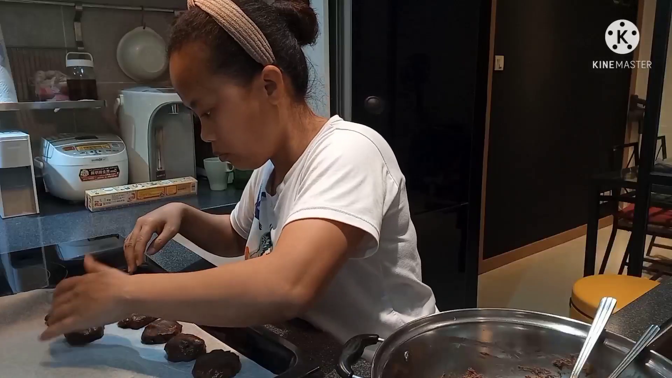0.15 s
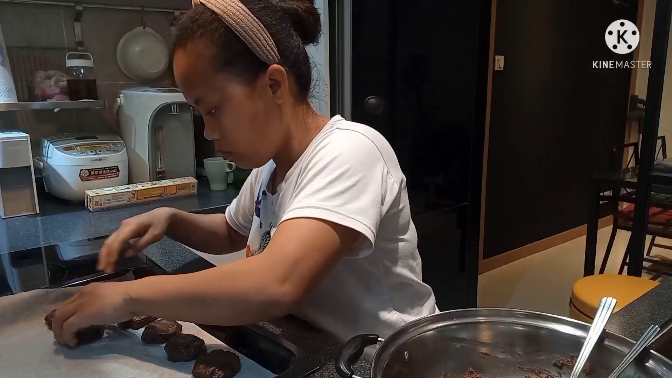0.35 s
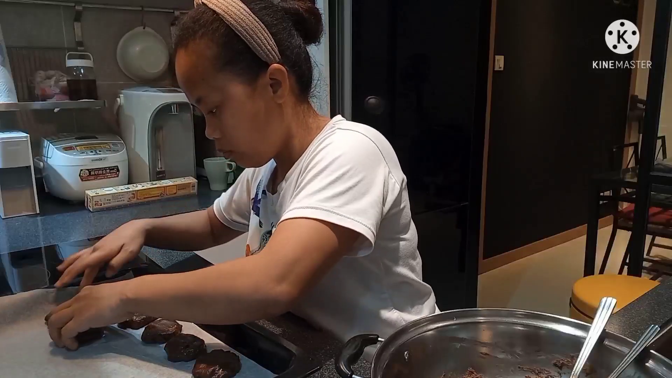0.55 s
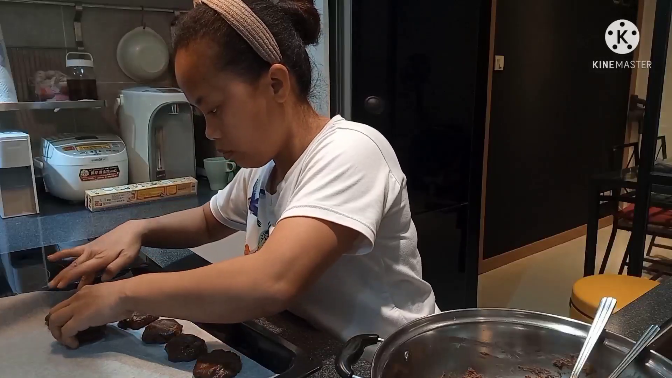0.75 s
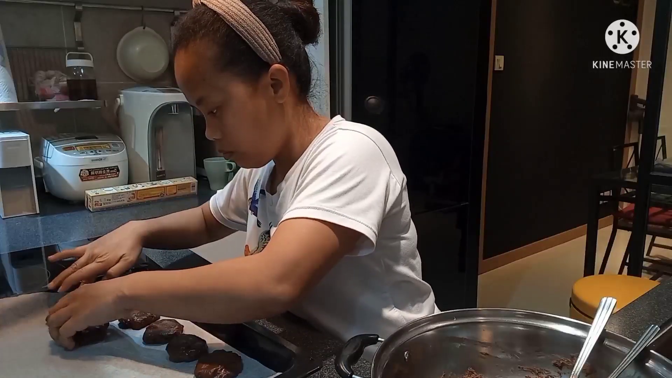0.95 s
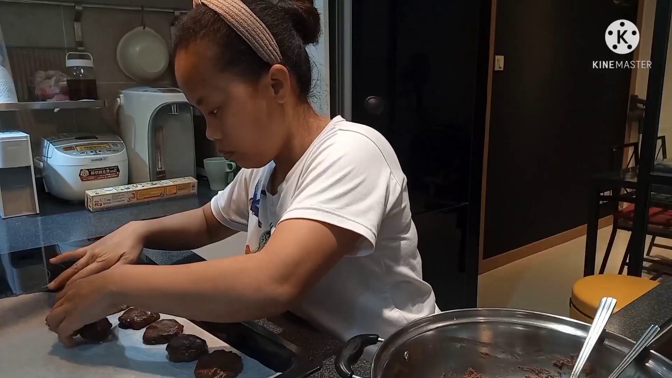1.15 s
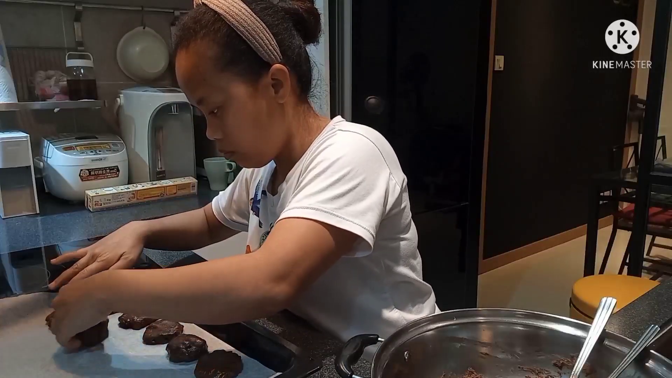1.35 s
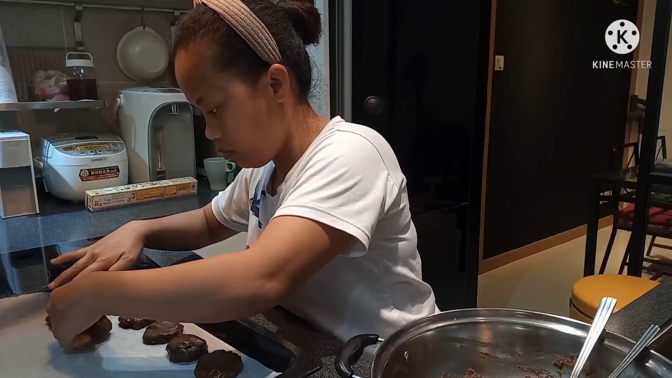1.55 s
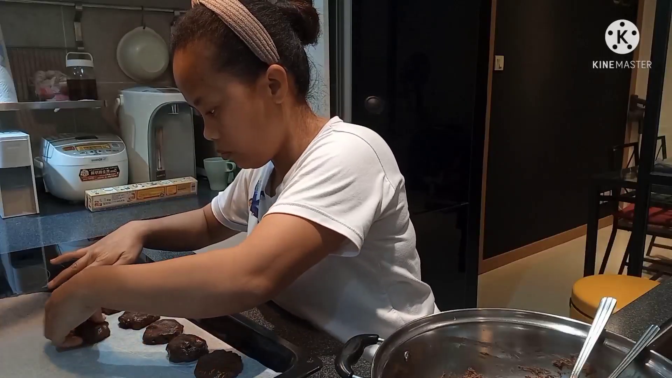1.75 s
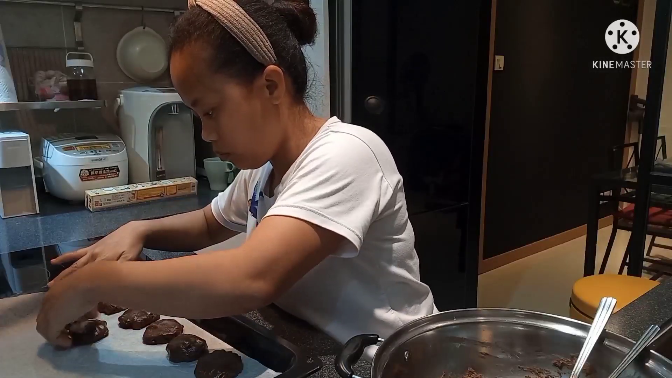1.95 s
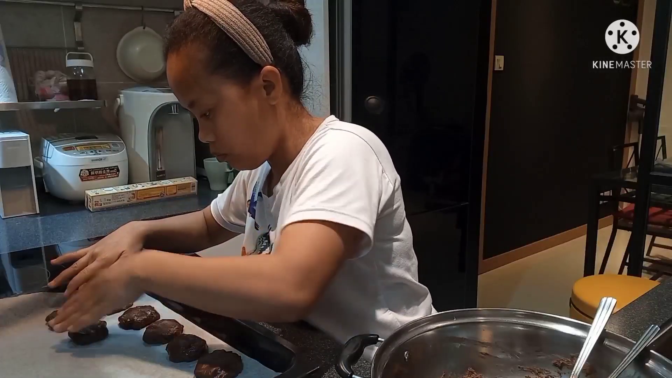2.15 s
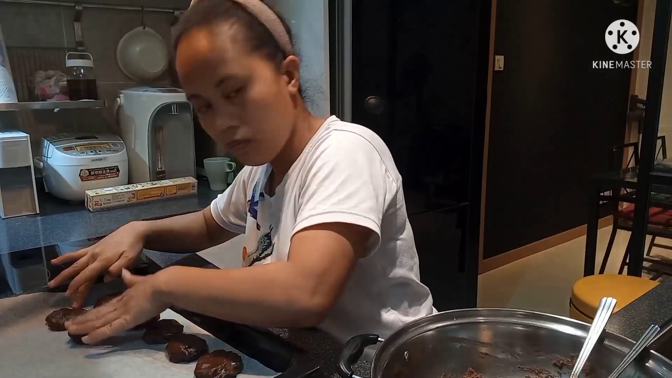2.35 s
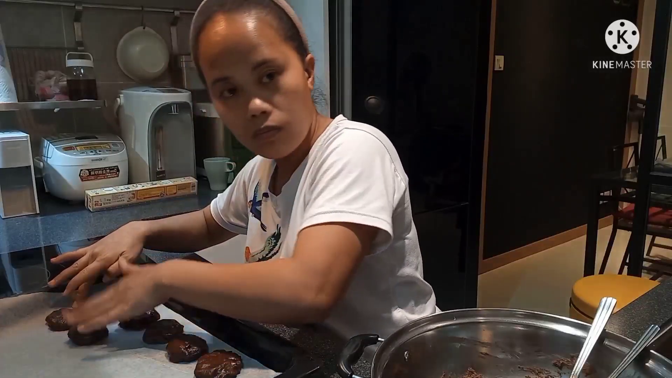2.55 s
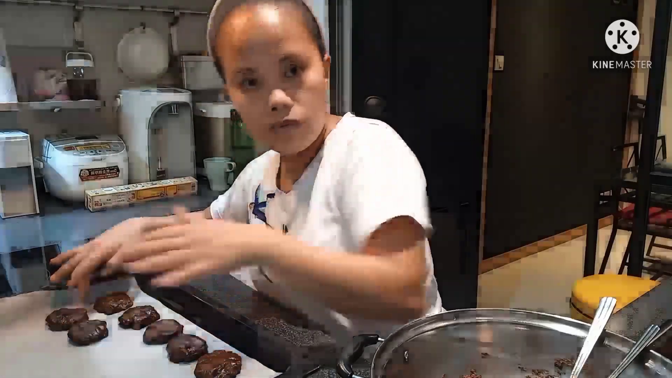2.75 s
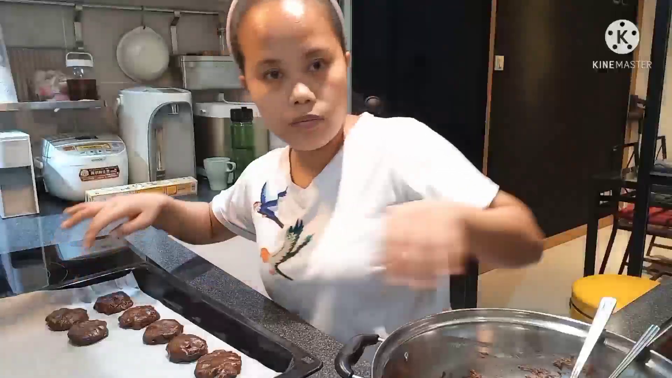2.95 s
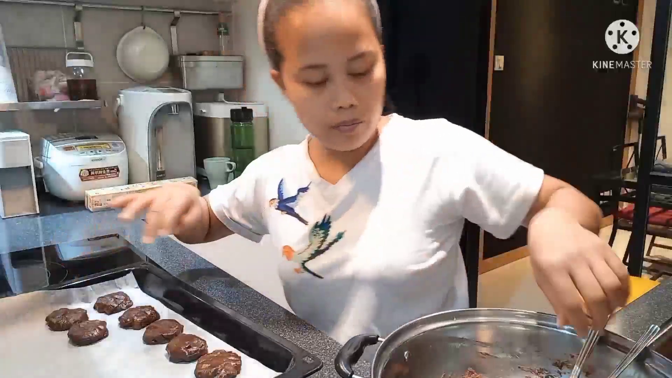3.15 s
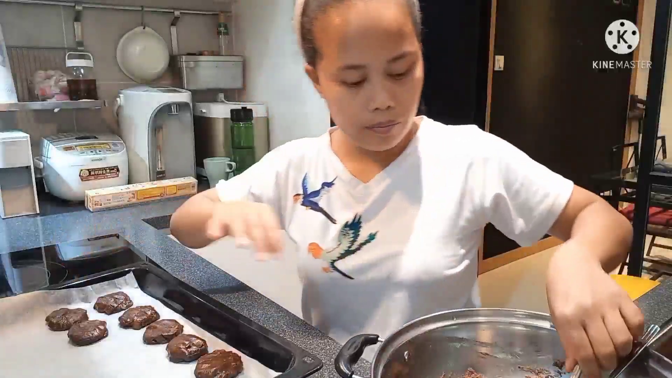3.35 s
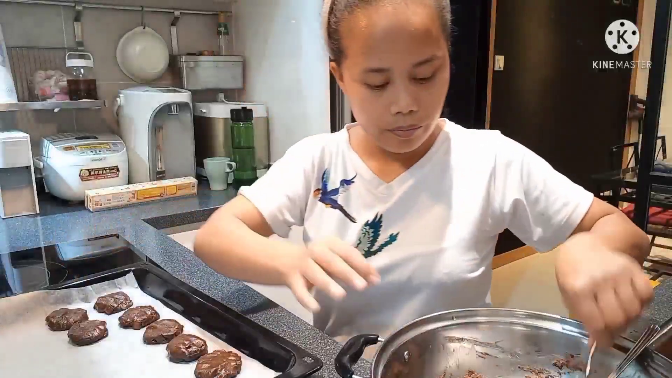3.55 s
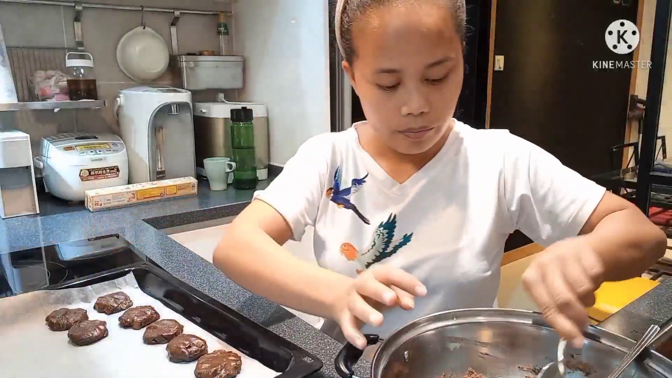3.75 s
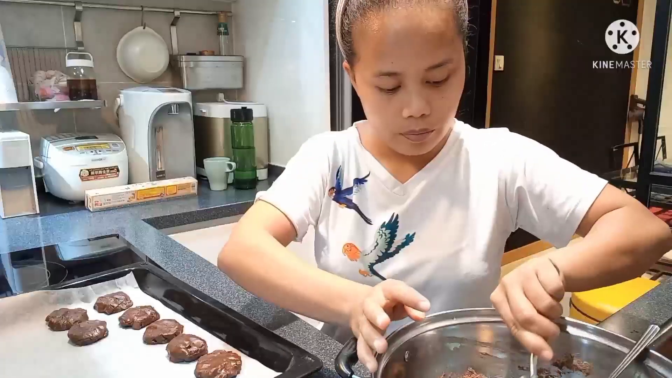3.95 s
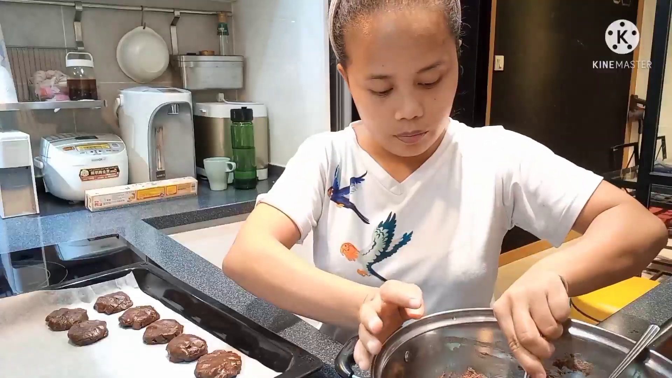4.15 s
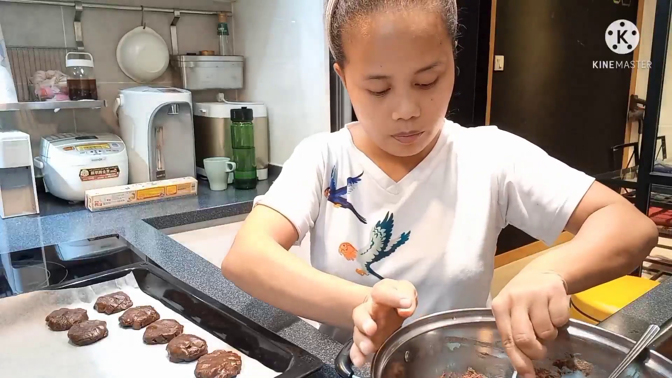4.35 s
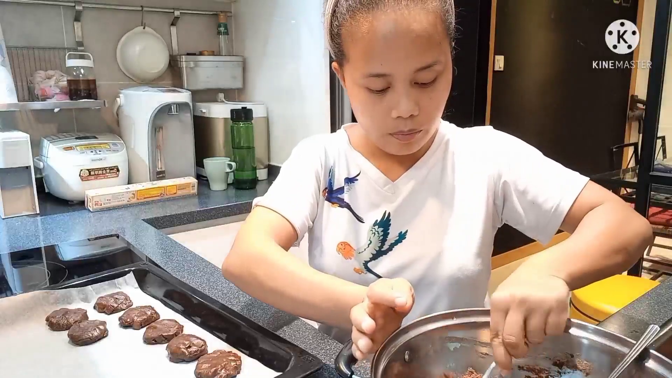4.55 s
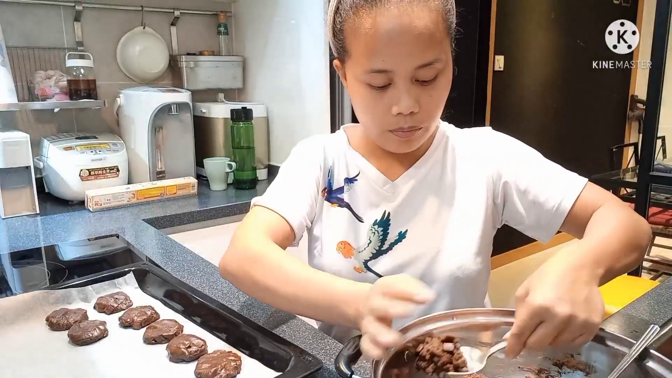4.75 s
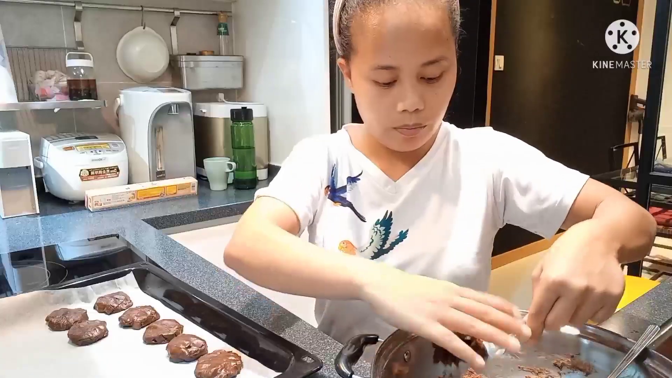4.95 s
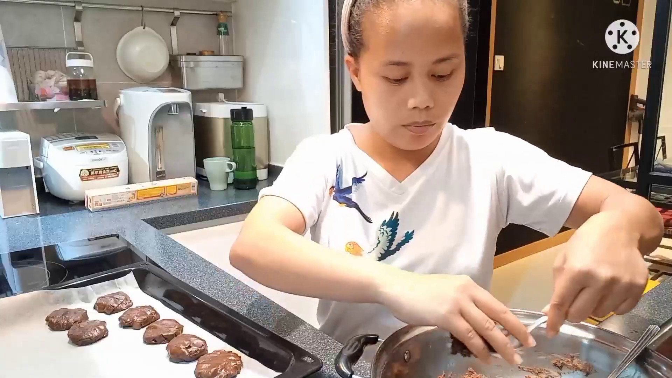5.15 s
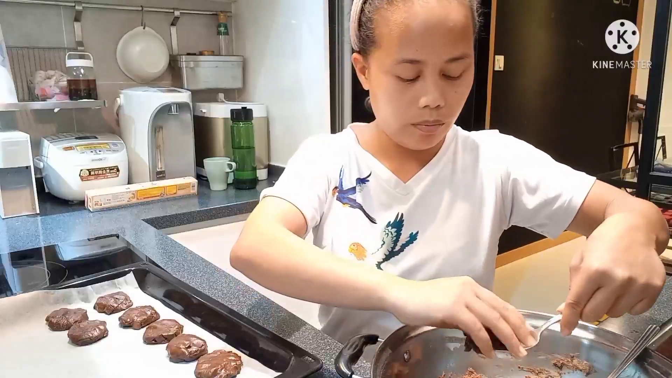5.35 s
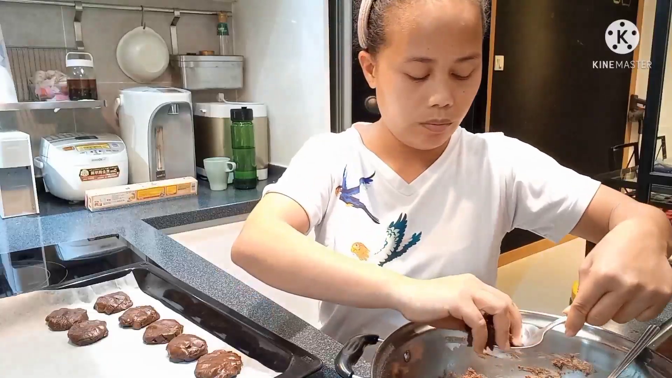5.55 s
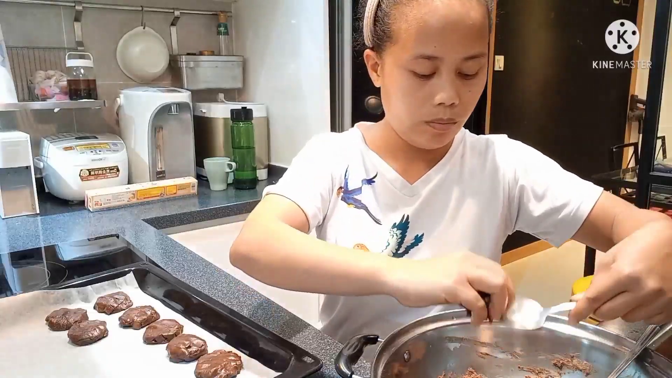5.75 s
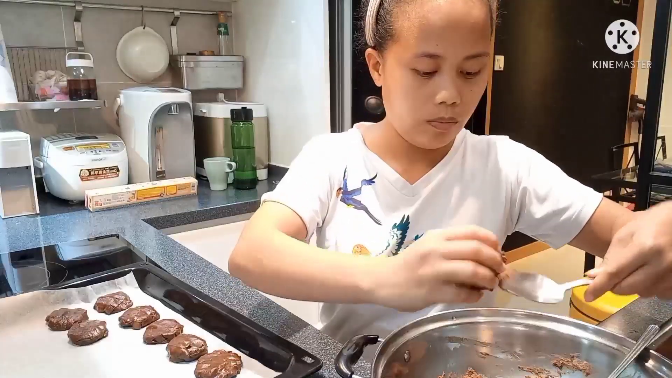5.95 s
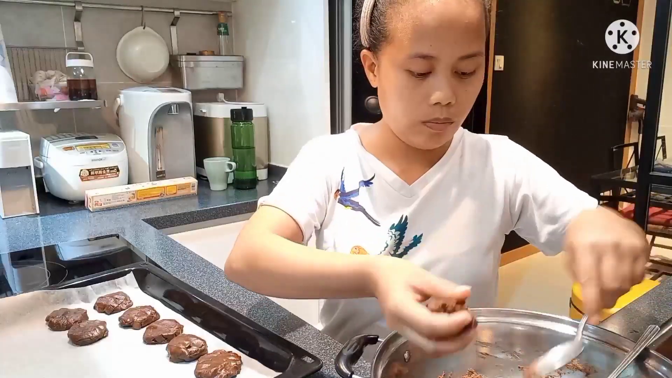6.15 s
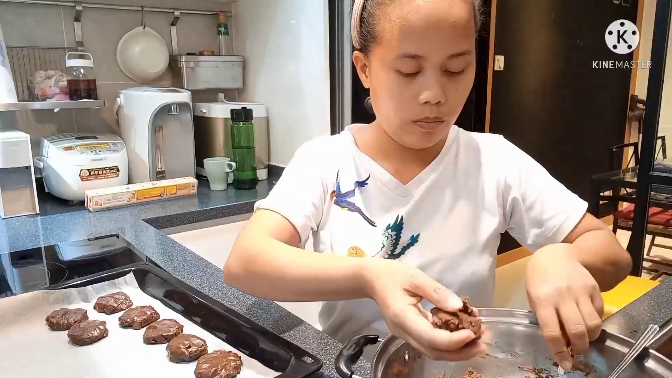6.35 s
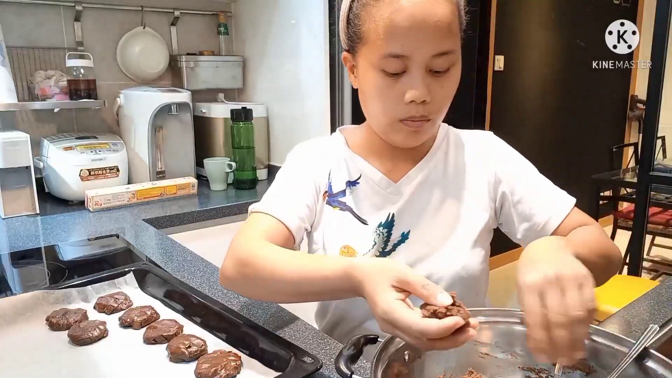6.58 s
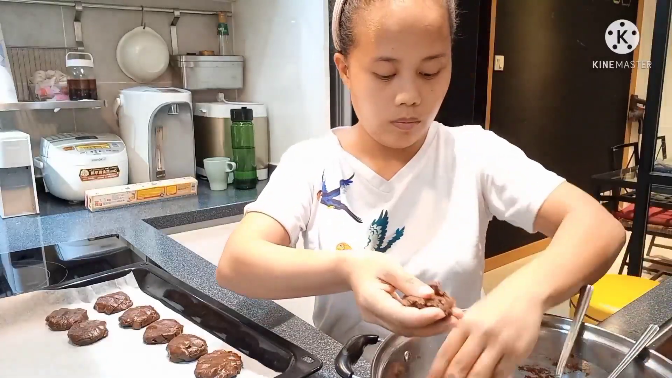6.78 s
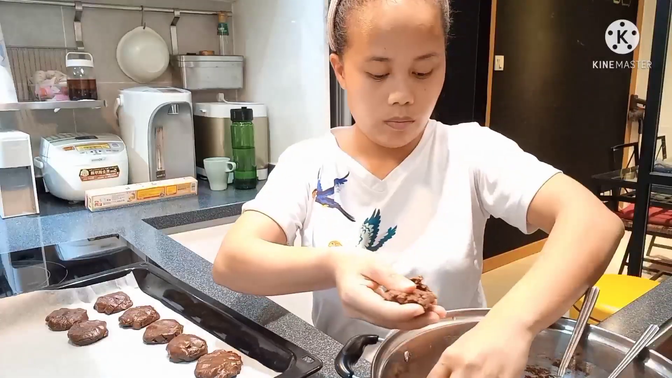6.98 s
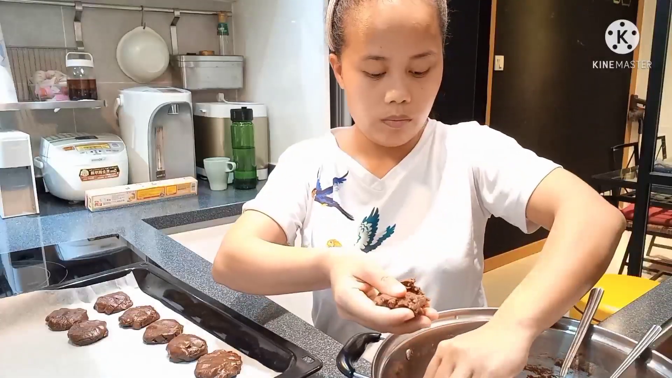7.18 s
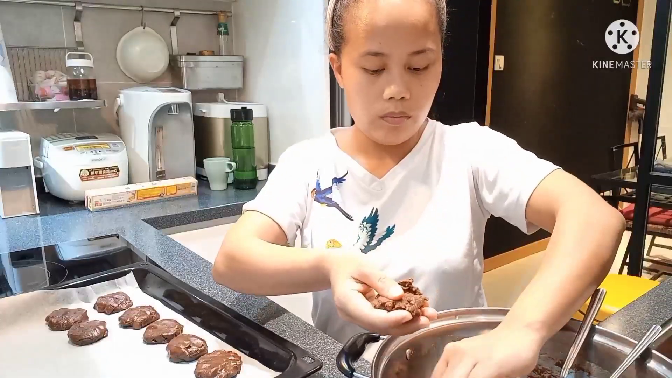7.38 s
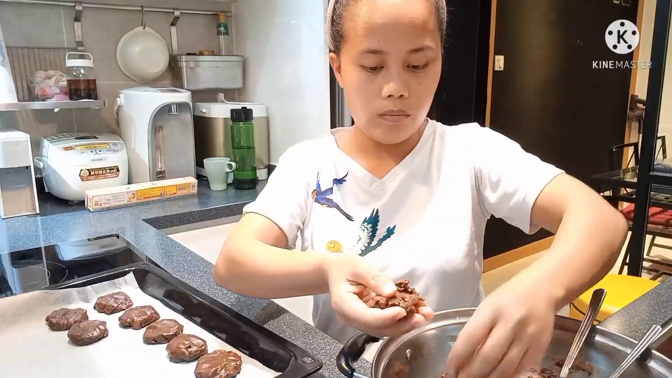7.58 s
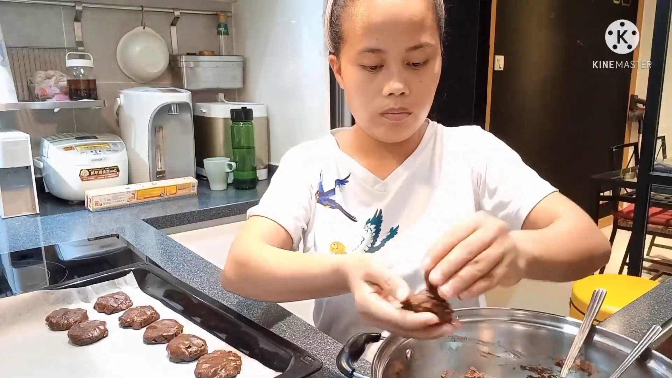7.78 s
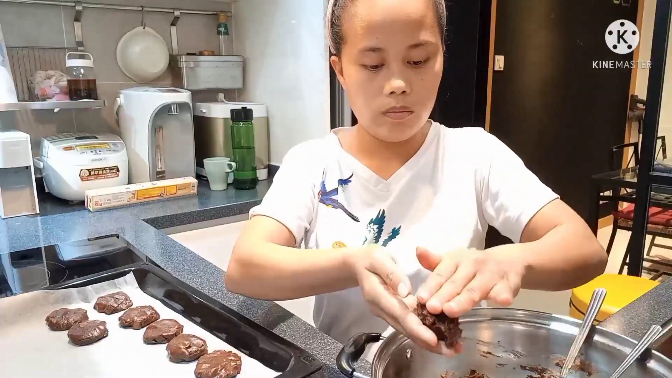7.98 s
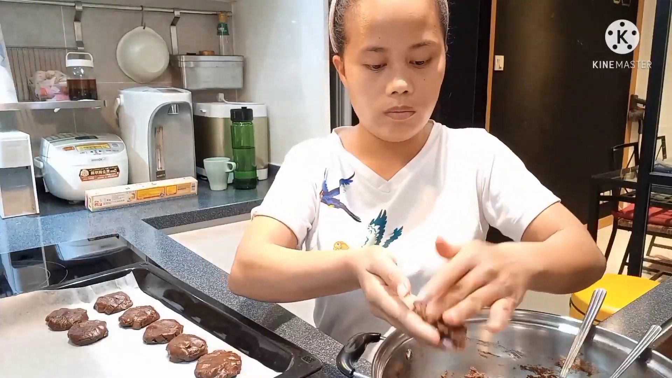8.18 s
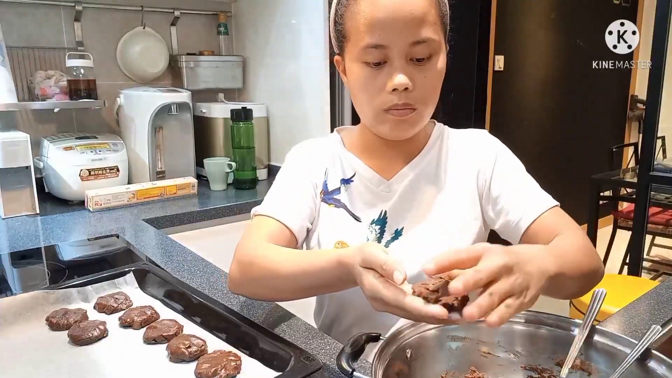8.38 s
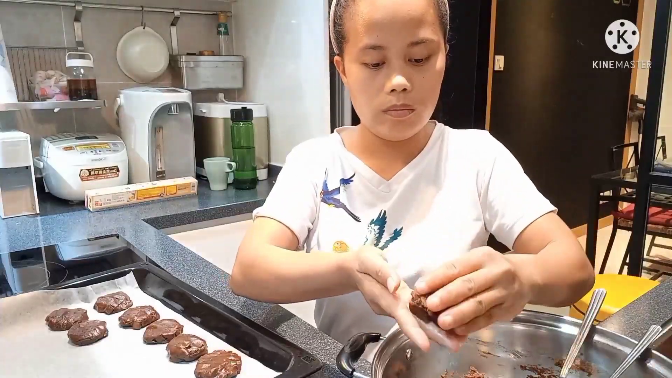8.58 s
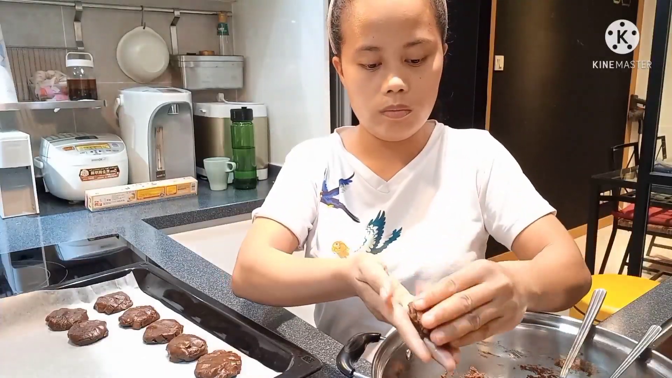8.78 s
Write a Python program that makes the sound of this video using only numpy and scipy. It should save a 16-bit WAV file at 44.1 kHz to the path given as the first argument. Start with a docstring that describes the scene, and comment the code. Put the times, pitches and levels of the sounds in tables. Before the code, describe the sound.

Close stereo pickup of cookie shaping at a kitchen counter. First, light paper crinkles and snaps with a low muffled bump; then a thin metallic slide, gritty scooping and hollow knocks in a dough-laden steel pot. A small rim tap precedes one sharp, ringing clank, far louder than anything else. Then brief rim slides, a sticky smack and near silence over soft air noise and a wavering low hum.

```python
"""A metal spoon works in a steel pot: it knocks, scrapes dough, and drops on the rim with a loud clank.
Shaped noise makes its knocks and scrapes; decaying sine modes make the pot ring.
Around it, baking paper crackles over a tray, the counter booms and sticky dough peels from the hands,
all built from clumped noise grains, short noise bursts and swelling low tones.
Behind lies a small, quiet kitchen: soft air noise and an appliance's wavering hum."""
import sys
import numpy as np
from scipy import signal
from scipy.fft import rfft, irfft, next_fast_len
from scipy.io import wavfile
from scipy.ndimage import uniform_filter1d, map_coordinates

SR = 44100
rng = np.random.default_rng(int(sys.argv[2]) if len(sys.argv) > 2 else 0)


def persist_wave(psi):
    """Save psi, clipped to +-1, as 16-bit WAV."""
    counts = np.round(np.clip(psi, -1, 1) * 32767).astype(np.int16)
    wavfile.write(sys.argv[1], SR, np.atleast_2d(counts).T)


N = 388958
TIME = np.arange(N) / SR  # the whole scene [s]
RING = np.arange(SR * 3 // 4) / SR  # the span of one hit or stroke [s]
SIDES = np.array([[.5], [-.5]])  # shares a left-minus-right difference between the channels
FLOOR_HZ = 216  # small contacts hold little below this


# overall colour of the clank: (frequency [Hz], gain [dB])
CLANK_COLOUR = [(250, 0.5), (500, -3), (750, 0), (1150, 4), (2750, -3.5), (4300, 1), (7000, -1.5),
                (11500, 3), (15000, 1)]


def clank(s=6.537, db=-14, ring_db=-2.0, clatter_t60=0.3, edge_t60=0.18, crack_db=-5, crack_t60=0.046):
    """The spoon falls against the pot: a crack, a dense clatter and the ringing modes."""
    noise = spread(noise_burst(), [(250, -2.0), (480, 4.5), (900, 2.5), (15000, 3)])
    dull, bright = split(steel(noise, width_hz=15, widening=0.011), 7500)
    clatter = dull * fade(clatter_t60) + bright * fade(edge_t60)
    ring = amp(ring_db) * unit_peak(ringing())
    crack = amp(crack_db) * noise * fade(crack_t60)
    hit = split(clatter + ring + crack, 160)[1]
    coloured = filtered(hit, lambda hz: amp(along(CLANK_COLOUR, hz)))
    out = np.zeros((2, N))
    add(out, s, amp(db) * unit_peak(coloured))
    return out


# resonances of the steel pot: (frequency [Hz], relative level [dB], t60 [s])
POT_MODES = [(443, -2.5, 0.37), (524, -0.5, 0.17), (606, -9.5, 0.34), (683.4, -3.5, 0.31),
             (707, -7.5, 0.29), (1066, -10.5, 0.3), (1198, -9.5, 0.37), (1222, -13, 0.42),
             (1575, -4.5, 0.2), (1945, -13.5, 0.37), (2199, -15.5, 0.36), (2570, -9.5, 0.48),
             (2700, -4, 0.21), (2956, -6, 0.24), (3470, -4, 0.33), (4140, -9.5, 0.28), (4650, -7.5, 0.26),
             (5476, -6.5, 0.23), (6240, -9.5, 0.35), (6540, -3.5, 0.38), (6790, 0, 0.26), (6770, -5, 0.23),
             (7200, -4.5, 0.24), (7678, -5.5, 0.23), (8484, -9.5, 0.25), (9400, -7.5, 0.23),
             (10300, -10.5, 0.27), (11064, -3, 0.13), (11700, -5.5, 0.13), (13260, -9.5, 0.22)]


def ringing(lag=0.0002, scatter=0.38, waver=0.58):
    """Pot modes lead on the right by lag seconds, with scattered phase; reflections make each one waver."""
    ring = 0
    knots = np.linspace(0, RING[-1], num=28)
    for hz, db, t60 in POT_MODES:
        phase = rng.uniform(0, 2 * np.pi) - 2 * np.pi * hz * lag * SIDES
        phase = phase + scatter * rng.standard_normal((2, 1))
        echoes = []
        for _ in SIDES:
            points = rng.standard_normal(len(knots)) + 1j * rng.standard_normal(len(knots))
            echoes.append(np.interp(RING, knots, points))
        tone = np.imag((1 + waver * np.array(echoes)) * np.exp(1j * (2 * np.pi * hz * RING + phase)))
        ring = ring + amp(db + along(LEAN, hz) * SIDES) * fade(t60) * tone
    return ring


def steel(x, width_hz=22, widening=0.0093):
    """The pot's resonances as noise bands, each a cluster of close modes that widens with pitch."""
    def gain(hz):
        power = 0
        for f, db, _ in POT_MODES:
            width = width_hz + widening * f
            power = power + amp(db) ** 2 / width / (1 + ((hz - f) / width) ** 2)
        return np.sqrt(power)
    return unit(filtered(x, gain))


# knocks of the dough-laden spoon on the bottom: (time [s], body level [dB], edge level [dB])
KNOCKS = [(4.5532, -39, -43), (4.6424, -38.5, -36.5), (4.742, -55, -53)]
# colour of a knock: (frequency [Hz], relative level [dB per Hz])
KNOCK_COLOUR = [(150, -58), (250, -36), (450, 0.5), (583, -11.5), (742, 2), (823, -12), (1030, -3),
                (1220, -18), (2130, -28), (3330, -34), (3830, -15), (5500, -8), (8320, -16), (15500, -17.5)]


def knocks(body_t60=0.2, edge_t60=0.18, crack_t60=0.062, room_db=-7):
    """Dough damps the pot's walls, leaving a hollow knock with a gritty edge."""
    out = np.zeros((2, N))
    for s, body_db, edge_db in KNOCKS:
        body, edge = split(spread(noise_burst(), KNOCK_COLOUR), 1730)
        body = split(body * fade(body_t60), FLOOR_HZ)[1]
        edge = edge * (fade(crack_t60) + amp(room_db) * fade(edge_t60))
        add(out, s, amp(body_db) * unit_peak(body) + amp(edge_db) * unit_peak(edge))
    return out


# the handle touches the rim before it falls: (time [s], level [dB])
TAPS = [(6.2555, -35)]
# colour of that touch: (frequency [Hz], relative level [dB per Hz])
TAP_COLOUR = [(150, -60.5), (250, -32), (442, -7.5), (705, -2.5), (897, -19), (1070, -9), (1330, -17.5),
              (1530, -9), (1820, -18.5), (2240, -8.5), (2900, -19.5), (4960, -11.5), (15500, -45.5)]


def rim_taps():
    """The handle meets the rim: a short noise burst with a strong room tail."""
    return clicks(TAPS, TAP_COLOUR, direct_t60=0.025, room_db=2, room_t60=0.27)


# light ticks of the spoon: (time [s], level before trim [dB])
TICKS = [(6.3091, -22), (6.3688, -37.5), (6.3754, -38.5)]
# colour of a tick: (frequency [Hz], relative level [dB per Hz])
TICK_COLOUR = [(300, -40.5), (450, -13), (1100, -22.5), (2500, -26), (4000, -14), (4950, -3), (6000, -14),
               (8000, -26.5), (11000, -24), (15000, -37)]


def spoon_ticks():
    """Light spoon contacts: very short, bright noise bursts."""
    return amp(-2.5) * clicks(TICKS, TICK_COLOUR, direct_t60=0.018, room_db=-7.5, room_t60=0.26)


# pushes of spoon or fingers through dough, loud in the body when they meet the pot:
# (time [s], rise [s], hold [s], body level before trim [dB], hiss level before trim [dB])
SCOOPS = [(3.96, 0.15, 0.069, -79, -65), (4.235, 0.011, 0.048, -58, -62.5),
          (4.33, 0.033, 0.16, -60.5, -62.5), (4.503, 0.018, 0.037, -54, -50.5),
          (4.61, 0.014, 0.098, -54.5, -56.5), (4.78, 0.071, 0.038, -86, -67.5),
          (7.13, 0.077, 0.046, -70.5, -75.5)]
# the handle slides on the bare rim: same columns as the scoops
SLIDES = [(3.455, 0.027, 0.0049, -49, -53), (6.868, 0.027, .035, -51, -60),
          (7.425, 0.033, 0.011, -62.5, -74.5)]
# colours of the dough-damped pot and the bare rim: (frequency [Hz], relative level [dB per Hz])
DAMPED_COLOUR = [(150, -53), (250, -18), (313, -18), (450, -6.5), (583, -12), (717, -3), (823, -12.5),
                 (1050, -8), (1220, -20), (1820, -18), (3390, -16), (5500, -9.5), (15500, -20)]
RIM_COLOUR = [(180, -51), (300, -15), (439, -6), (685, -6), (849, -8.5), (1020, 2.5), (1390, -25.5),
              (1970, -13), (3230, -19.5), (4570, -15.5), (5050, -21), (6570, -16), (15500, -28)]


def scraping(ring_db=-4):
    """The spoon grinds through sugary dough, and its handle slides on the ringing rim."""
    grit = grains(rate=800, spread_db=3, wet=1.2)
    slips = grains(rate=1200, spread_db=3, wet=1.2)
    scoop = spread(grit, DAMPED_COLOUR)
    rim_ring = amp(ring_db) * steel(slips, width_hz=5.2, widening=0.0018)
    slide = spread(unit(slips) + rim_ring, RIM_COLOUR)
    # falls in dB per s; the lag [s] makes the pot's body swell after the hiss of a slide
    scoops = friction(SCOOPS, scoop, body_db=-1.5, hiss_db=0.0, body_fall=176, hiss_fall=176)
    slides = friction(SLIDES, slide, body_db=-3, hiss_db=5.5, body_fall=253, hiss_fall=277, lag=0.012)
    return scoops + slides


def friction(rows, carrier, body_db, hiss_db, body_fall, hiss_fall, lag=0):
    """Friction on the pot: pressure drives the body, speed the hiss, each with its own stroke levels."""
    body, hiss = split(carrier, 1510)
    body = amp(body_db) * strokes(rows, body_fall, lag) * unit(body)
    hiss = amp(hiss_db) * strokes(rows, hiss_fall, axis=4) * unit(hiss)
    return body + hiss


# handle tones that start during the first two slides, pitched by the grip:
# (time [s], frequency [Hz], level [dB], t60 [s])
HANDLE_TONES = [(3.478, 1926, -55, .22), (3.478, 4490, -61.5, 0.35), (3.478, 740, -56, .15),
                (6.9, 2170, -61, .65), (6.89, 7100, -58, .3)]


def handle(attack=0.004):
    """Thin decaying tones of the sliding spoon handle."""
    out = np.zeros((2, N))
    for s, hz, db, t60 in HANDLE_TONES:
        tone = np.sin(2 * np.pi * hz * RING + rng.uniform(0, np.pi, (2, 1)))
        add(out, s, amp(db) * tone * fade(t60) * (1 - np.exp(-RING / attack)))
    return out


# crumbs of sugar cracking under the spoon: (time [s], level before trim [dB])
CRUNCHES = [(3.434, -62), (3.9848, -55), (4.2433, -55), (4.5205, -58), (4.632, -38.5), (4.716, -49)]


def sugar_crunches():
    """Sugar crumbs crack: short bursts in the bright colour of sticky dough."""
    return amp(-7.5) * clicks(CRUNCHES, STICKY_COLOUR, direct_t60=0.019, room_db=-4.5, room_t60=0.48)


# thuds through the counter: (time [s], level [dB], boom frequency [Hz], rise [s])
THUDS = [(1.049, -48, 106, 0.031), (2.58, -53.5, 72.5, 0.04), (6.539, -28.5, 112.3, 0.011)]
# colour of the counter's knock: (frequency [Hz], relative level [dB per Hz])
COUNTER_COLOUR = [(20, -65.5), (45, -40), (62, -24.5), (85, -6.5), (115, -0.5), (140, -13), (250, -18.5),
                  (400, -45.5)]


def thuds(boom_db=0, boom_t60=0.46, knock_t60=0.35):
    """Pushes on the counter wake a low boom that swells and dies."""
    out = np.zeros((2, N))
    for s, db, hz, rise in THUDS:
        knock = spread(noise_burst(), COUNTER_COLOUR) * fade(knock_t60)
        boom = amp(boom_db) * np.sin(2 * np.pi * hz * RING) * fade(boom_t60)
        swell = (1 - np.exp(-RING / rise)) ** 2
        add(out, s, amp(db) * unit_peak((knock + boom) * swell))
    return out


# fingers touch and shift the baking paper: (time [s], rise [s], hold [s], level [dB])
TOUCHES = [(0, 0.043, 0.026, -64), (.635, 0.029, .02, -64.5), (.69, 0.013, 0.047, -44),
           (.86, 0.012, 0.056, -61), (.985, 0.022, 0.17, -55.5), (1.35, 0.07, 0.076, -58.5),
           (1.72, 0.038, 0.0078, -67.5), (1.79, .07, .01, -65), (1.965, 0.051, .005, -66.5),
           (2.472, 0.018, 0.0046, -65.5), (2.63, 0.029, .015, -79.5), (2.75, 0.037, .005, -68.5)]
# the palm flattens a cookie on the tray: (time [s], rise [s], hold [s], level before trim [dB])
PRESSES = [(.69, 0.064, 0.023, -55.5), (1.078, 0.022, .005, -52), (2.475, .022, .005, -70)]
# colour of the pressed tray: (frequency [Hz], relative level [dB per Hz])
TRAY_COLOUR = [(180, -53.5), (300, -19), (439, -9), (507, -12.5), (2140, -8), (3500, -9.5), (4550, -34),
               (7700, -120)]


def paper(press_db=-1):
    """Baking paper crackles under the fingers; firm pressure also sounds the tray."""
    creases = grains(rate=600, spread_db=4, wet=1.2)
    rub = grains(rate=900, spread_db=3, wet=1.5)
    crinkle = strokes(TOUCHES, fall_db_per_s=225) * spread(creases, CRINKLE_COLOUR)
    tray = strokes(PRESSES, fall_db_per_s=153) * spread(rub, TRAY_COLOUR)
    return crinkle + amp(press_db) * tray


# snaps of the baking paper: (time [s], level before trim [dB])
SNAPS = [(0.6996, -44), (0.7296, -23.5), (0.9853, -47), (1.0126, -37.5), (1.0894, -36), (1.1702, -39),
         (1.4374, -40.5), (1.496, -46.5), (1.753, -53.5)]
# colour of crackling paper: (frequency [Hz], relative level [dB per Hz])
CRINKLE_COLOUR = [(470, -39), (800, -22), (1280, -15.5), (1600, -15.5), (2870, -4.5), (4320, -1),
                  (4770, 0.5), (10300, -6), (15500, -9)]


def paper_snaps():
    """Single creases snap: bright noise bursts with a soft tail."""
    return amp(-7.5) * clicks(SNAPS, CRINKLE_COLOUR, direct_t60=0.0556, room_db=-15.5, room_t60=0.17)


# fingers gather and pat dough: (time [s], rise [s], hold [s], level before trim [dB])
KNEADS = [(5.71, 0.14, 0.12, -79), (7.1, 0.11, 0.044, -61.5), (8.0, 0.15, .13, -80.5),
          (8.53, 0.21, .025, -81.5)]
# sticky smacks of dough on skin: (time [s], level [dB])
SMACKS = [(5.26, -72), (7.228, -52), (8.236, -62), (8.6842, -71), (8.7316, -70)]
# colour of sticky dough: (frequency [Hz], relative level [dB per Hz])
STICKY_COLOUR = [(880, -59), (1500, -32), (2640, -6), (3580, -45), (3720, -10), (5400, 3.5), (11200, -4),
                 (15500, -10)]


def dough(knead_db=2):
    """Sticky dough peels from the skin in tiny crackles and single smacks."""
    crackle = spread(grains(rate=240, spread_db=0.5, wet=1.0), STICKY_COLOUR)
    peel = amp(knead_db) * strokes(KNEADS, fall_db_per_s=280) * crackle
    return peel + clicks(SMACKS, STICKY_COLOUR, direct_t60=.012, room_db=-12.5, room_t60=0.43)


# colour of the air noise: (frequency [Hz], relative level [dB per Hz])
AIR_COLOUR = [(15, -76), (25, -41.5), (99, -1.5), (119, -5.5), (136, -19.5), (215, -21), (246, -27),
              (399, -28), (445, -23), (482, -31.5), (537, -25), (666, -33), (1490, -36.5), (8130, -51.5),
              (15500, -45.5)]
# appliance hum: (frequency [Hz], rms level before trim [dB], waver depth [dB])
HUM = [(106.7, -68, 2.5), (216, -84.5, 3), (442.4, -77, 2), (540, -92.5, 3), (627, -93, 3.5)]


def room_tone(air_db=-64.0, hum_db=-1, drift=0.97):
    """Soft air noise and an appliance's hum, whose tones waver in level and drift in phase (radians)."""
    air = amp(air_db) * spread(rng.standard_normal((2, N)), AIR_COLOUR)
    hum = 0
    for hz, db, waver_db in HUM:
        level = amp(db + hum_db + along(LEAN, hz) * SIDES + waver_db * wobble(12))
        tone = np.sqrt(2) * np.sin(2 * np.pi * hz * TIME + drift * wobble(4.6))
        hum = hum + level * tone
    return air + hum


def clicks(table, spectrum, direct_t60, room_db, room_t60):
    """Short contacts: a fast noise burst plus a slower tail for the kitchen's echo."""
    out = np.zeros((2, N))
    for s, db in table:
        burst = noise_burst() * (fade(direct_t60) + amp(room_db) * fade(room_t60))
        add(out, s, amp(db) * unit_peak(split(spread(burst, spectrum), FLOOR_HZ)[1]))
    return out


def strokes(rows, fall_db_per_s, lag=0, axis=3):
    """Gain of hand strokes: each swells, holds and dies away; axis picks the level column."""
    gain = np.zeros(N)
    for row in rows:
        s, rise, hold = row[:3]
        part = gain[max(round((s + lag) * SR), 0):][:len(RING)]
        t = RING[:len(part)]
        swell = np.clip(t / max(rise, .001), 0, 1) ** 1.17
        fall_db = fall_db_per_s * np.maximum(t - rise - hold, 0)
        part[:] = np.maximum(part, swell * amp(row[axis] - fall_db))  # the louder stroke wins
    return gain


def grains(rate, spread_db, wet):
    """Tiny slips of uneven size, rate per second, whose loudness clumps, over a steady noise wash."""
    unevenness = rng.standard_normal(N) + .6 * wobble(45)
    sizes = amp(spread_db * np.clip(unevenness, -2, 2))
    hits = (rng.random(N) < rate / SR) * sizes
    slips = np.abs(uniform_filter1d(hits, size=24))
    return unit(slips * rng.standard_normal((2, N))) + wet * rng.standard_normal((2, N))


# likeness of the two channels: (frequency [Hz], correlation, clipped to 1)
ALIKE = [(30, 0), (70, 1.16), (200, 0.52), (500, 0.7), (1000, -0.09), (3000, -0.0152)]
# stereo lean: (frequency [Hz], left minus right [dB])
LEAN = [(120, -1.5), (300, 0.5), (500, -10), (1100, -2.5), (2500, 0.5), (6500, -1), (12000, -2.5)]


def spread(pair, spectrum):
    """Colour two unrelated signals and place them: bass more alike, treble diffuse, mostly leaning right."""
    def mid_side_gain(hz):
        turn = np.arccos(np.clip(along(ALIKE, hz), -1, 1)) / 2
        return amp(along(spectrum, hz)) * [np.cos(turn), np.sin(turn)]
    mid, side = filtered(pair, mid_side_gain)
    stereo = np.array([mid + side, mid - side])
    return unit(filtered(stereo, lambda hz: amp(SIDES * along(LEAN, hz))))


def noise_burst():
    """Unrelated white noise for two channels, one hit long."""
    return rng.standard_normal((2, len(RING)))


def amp(db):
    """Decibels to gain."""
    return 10 ** (np.asarray(db) / 20)


def unit(x):
    """Scale to rms 1."""
    return x / np.sqrt(np.mean(x ** 2) + 1e-20)


def unit_peak(x):
    """Scale so that the loudest 5 ms have rms 1."""
    return x / np.sqrt(uniform_filter1d(np.mean(x ** 2, 0), size=220).max())


def along(points, hz):
    """Read (frequency, value) points on a log axis."""
    f, v = np.transpose(points)
    return np.interp(np.log(hz + 1), np.log(f), v)


def fade(t60):
    """Exponential decay by 60 dB in t60 seconds."""
    return amp(-60 * RING / max(t60, .001))


def wobble(rate):
    """A smooth random curve, rate knots a second."""
    return map_coordinates(rng.standard_normal(int(N * rate / SR) + 4), [TIME * rate])


def filtered(x, gain):
    """Pass x through a gain that depends on frequency."""
    n = x.shape[-1]
    m = next_fast_len(n + 8192)
    return irfft(rfft(x, m) * gain(np.fft.rfftfreq(m, 1 / SR)), m)[..., :n]


def split(x, hz):
    """The parts of x below and above a frequency."""
    parts = []
    for kind in ("low", "high"):
        parts.append(signal.sosfilt(signal.butter(4, hz, kind, fs=SR, output="sos"), x))
    return parts


def add(track, s, sound):
    """Mix a sound in at time s."""
    part = track[:, round(s * SR):][:, :sound.shape[1]]
    part += sound[:, :part.shape[1]]


def scene():
    """Everything at the counter, in stereo."""
    spoon = clank() + knocks() + rim_taps() + spoon_ticks() + scraping() + handle() + sugar_crunches()
    return spoon + thuds() + paper() + paper_snaps() + dough() + room_tone()


def record(dry):
    """A very steep low-pass closes the top of the band."""
    top_hz = 15650
    return filtered(dry, lambda hz: 1 / np.sqrt(1 + (hz / top_hz) ** 200))


dry = scene()
out = record(dry)
persist_wave(out)
```